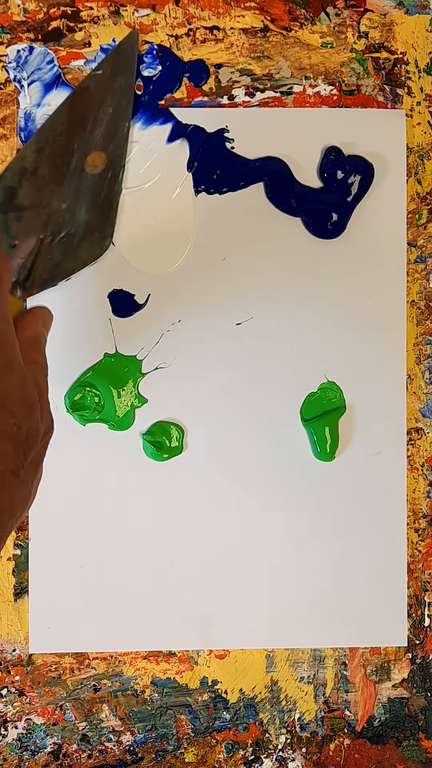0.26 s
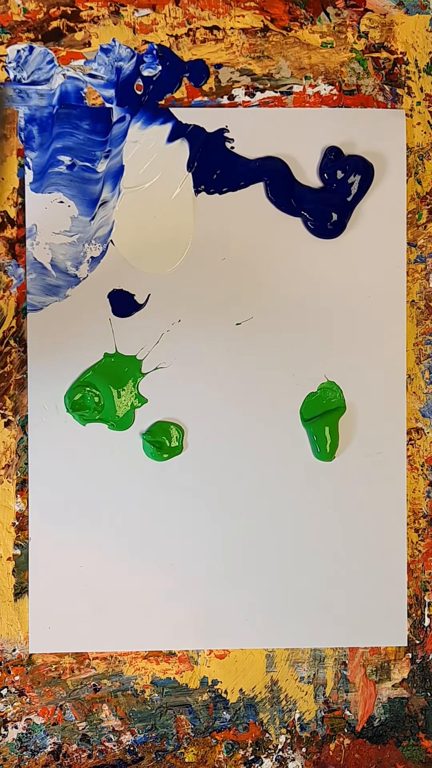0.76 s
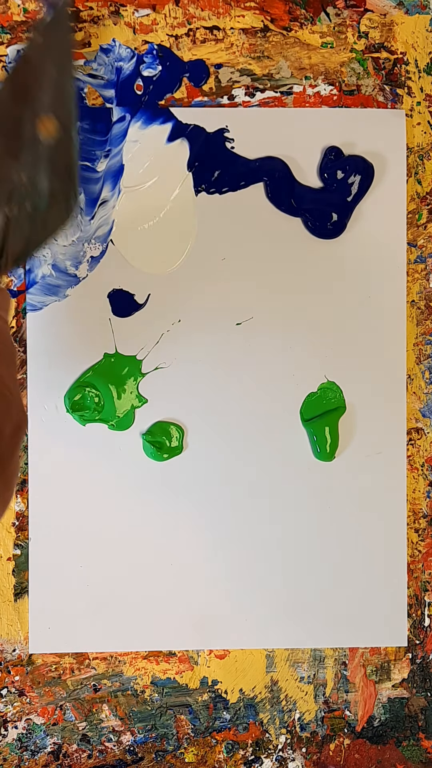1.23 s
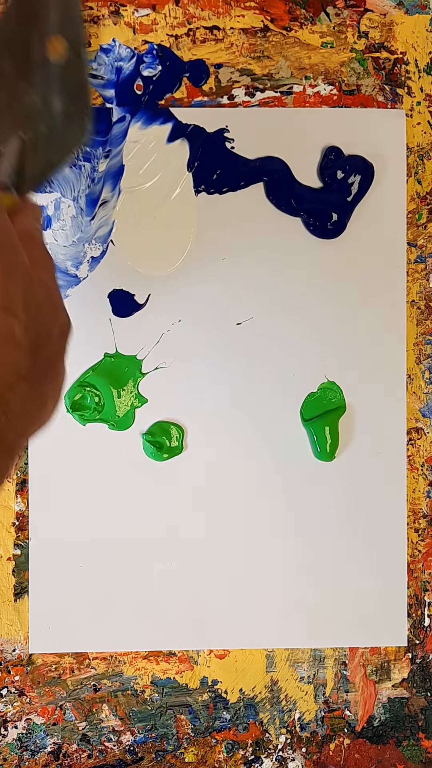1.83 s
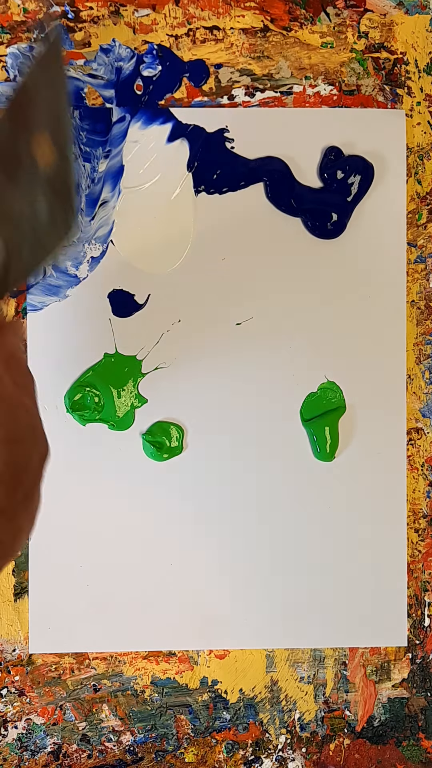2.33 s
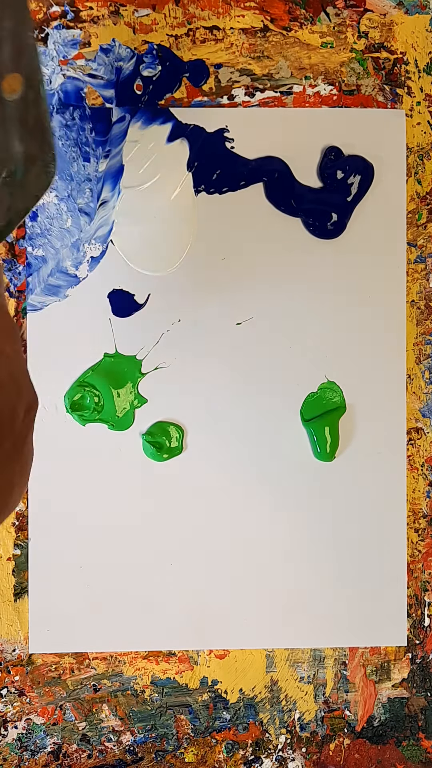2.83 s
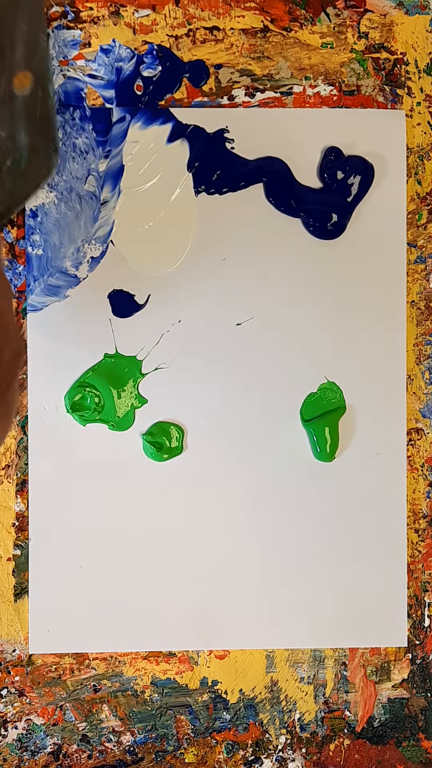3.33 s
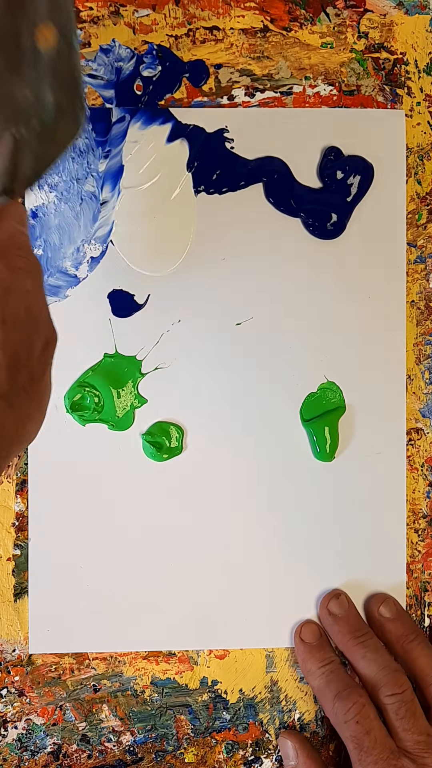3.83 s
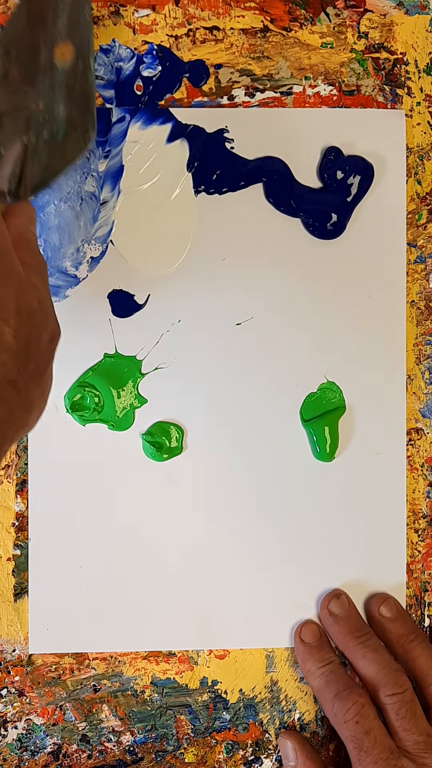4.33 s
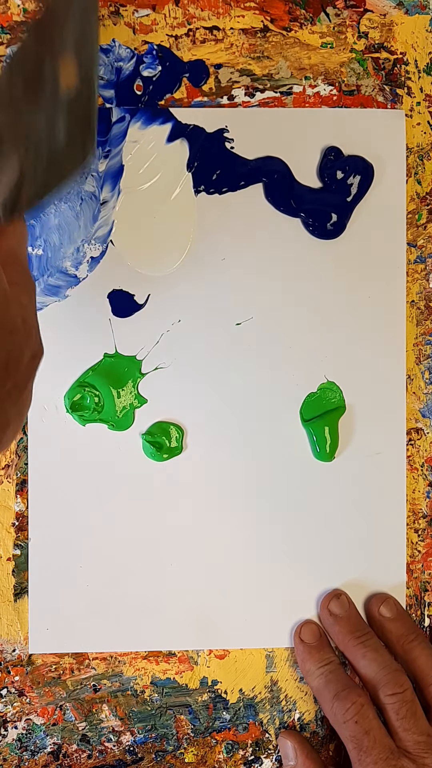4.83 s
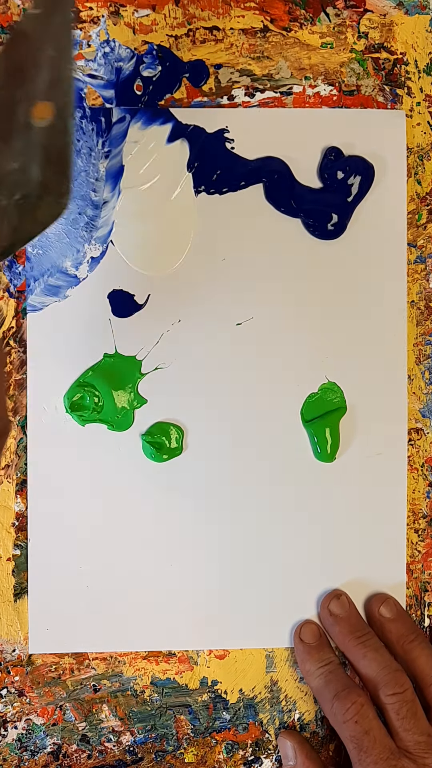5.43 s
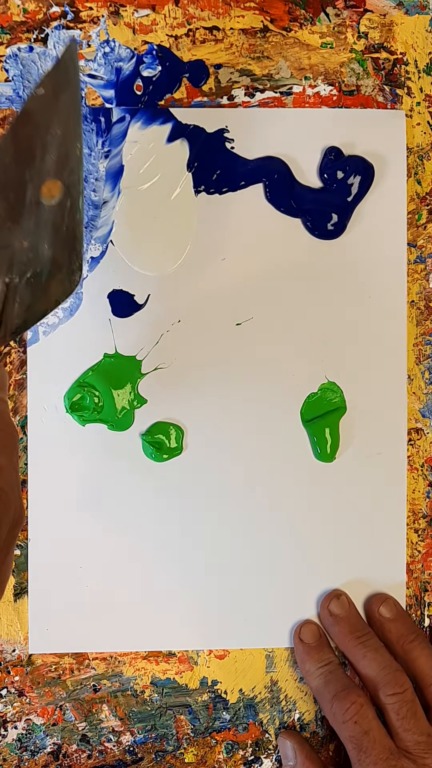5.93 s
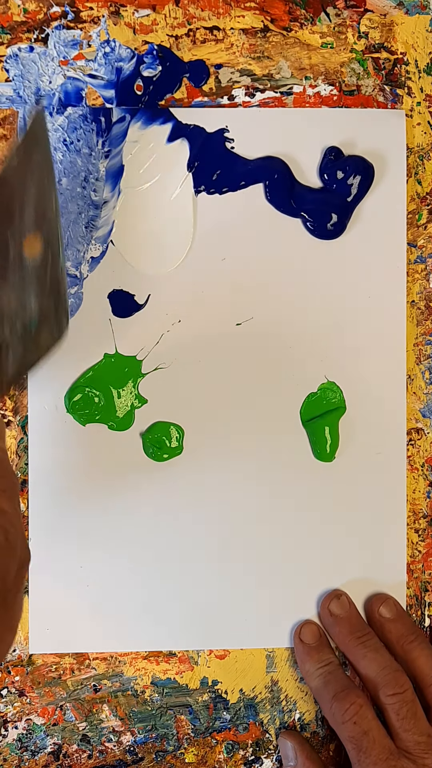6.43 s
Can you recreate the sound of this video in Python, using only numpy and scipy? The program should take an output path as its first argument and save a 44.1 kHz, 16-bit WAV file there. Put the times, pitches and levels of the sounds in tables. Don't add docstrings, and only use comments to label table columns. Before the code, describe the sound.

Soft hissing strokes and light dabs of a steel painting knife in wet paint, then hard, flat, rapid slaps with sticky peeling between them.

```python
import sys
import numpy as np
from scipy import signal
from scipy.fft import rfft, irfft, next_fast_len
from scipy.io import wavfile
from scipy.ndimage import uniform_filter1d, map_coordinates

SR = 44100
rng = np.random.default_rng(int(sys.argv[2]) if len(sys.argv) > 2 else 0)


def wrap_up_sound(samples):
    columns = np.atleast_2d(samples).T
    tamed = np.clip(columns, -1, 1)
    steps = np.round(tamed * 32767).astype(np.int16)
    wavfile.write(sys.argv[1], SR, steps)


def level_to_linear(level):
    exponent = np.asarray(level, float) / 20
    return 10 ** exponent


N = 294147
SPAN = 13600

# (time [s], level [dB])
HUM_LEVEL = [(0, -52), (.5, -54.5), (1.08, -58.5), (2.3, -61.5), (3.7, -68), (5, -68), (6.67, -48.5)]
# (frequency [Hz], gain [dB])
HUM_COLOUR = [(15, -34.5), (25, -7), (97, 1), (214, -18.5), (288, 1), (389, -9.5), (600, -9), (651, -2),
              (854, -14.5), (1060, -4.5), (4130, -26.5), (15200, -36.5), (16500, -41)]

# (full pressure [s], rise [s], hold [s], wet hiss [dB], paper rasp [dB])
STROKES = [
    (0.0, .01, 0.039, -71, -59),
    (0.281, .015, .005, -57, -44),
    (.432, 0.14, 0.04, -63.5, -57),
    (0.615, 0.13, 0.2, -64, -73),
    (0.821, 0.048, 0.006, -53, -42.5),
    (1.18, .01, 0.1, -72, -89),
    (1.296, 0.024, 0.013, -47.5, -46.5),
]
# (frequency [Hz], gain [dB])
RASP_COLOUR = [(700, -24), (1500, 3.5), (2700, 35.5), (3300, -21), (5000, -1)]
# (frequency [Hz], gain [dB])
PAINT_COLOUR = [(710, -54), (1200, 5), (2220, 8.5), (2950, 6), (3970, 3.5), (13000, -8.5), (15800, -8),
                (16500, -50.5)]
STROKES_END_S = 1.6
STROKE_RISE_DB, HISS_FADE_DB_PER_S, RASP_FADE_DB_PER_S = 37, 221, 295.5

# (time [s], peak [dB], blade edge [dB], table boom [dB], table body [dB])
DABS = [
    (0.272, -33.5, -26, -15, -33),
    (0.297, -33, -42, -16, -10),
    (0.435, -33.5, -45, -22, -9),
    (0.79, -37, -20, -25, -3),
    (0.83, -31.5, -32, -25, -9),
    (1.179, -36.5, -40, -14, -0.5),
    (1.204, -48.5, -24, -1, 3.5),
]
# (time [s], peak [dB], blade edge [dB], table boom [dB], table body [dB])
SLAPS = [(1.492, -5.5, -25, -19, -15.5), (1.791, -5, -37, -14.5, -2), (2.11, -7, -10.5, -28, -19.5),
         (2.408, -4.5, -21, -14.5, -11.5), (2.7, -2.5, -20.5, -26, -9.5),
         (3.034, -5.5, -17.5, -21.5, -13.5), (3.313, -5.5, -16, -26, -14.5),
         (3.497, -22.5, 1.5, -28.5, -36), (3.717, -3.5, -35, -18, -5), (3.936, -6, -24, -21, -10),
         (4.14, -4.5, -27, -16, -12), (4.314, -4, -33, -16.5, -5.5), (4.509, -4, -27, -22.5, -19.5),
         (4.701, -5, -21, -25, -10.5), (4.906, -3.5, -24.5, -33, -17), (5.122, -9, -22, -20, -13.5),
         (5.357, -9.5, -25.5, -18, -43), (5.609, -2.5, -29.5, -22.5, -8), (5.865, -5, -18.5, -32.5, -12),
         (6.092, -5.5, -8.5, -26, -6.5), (6.307, -5, -12.5, -17, -8.5), (6.513, -3.5, -8, -22, -13.5)]
# (frequency [Hz], gain [dB])
SLAP_COLOUR = [(240, -16), (400, -9), (538, -19), (1030, -11), (1430, -18.5), (4830, -28), (5300, -28.5),
               (10200, -34.5), (11900, -33.5), (15700, -42), (16500, -66.5)]
MIDDLING_EDGE_DB = -20
BRIGHT_GROWS = 0.63
PAN_DB, PAN_PER_EDGE = 8, -0.52

# (frequency [Hz], level [dB], decay t60 [s])
LEG_MODES = [(55, -5, .26), (67, -2, .26), (84, 0, .3)]
THUMP_DB, THUMP_GROWS = -19, 0.51
# (frequency [Hz], level [dB], decay t60 [s])
BOOM_MODES = [(113, -2, .3), (123, -4, .26), (133, 0, .28), (165, -10, .25), (200, -10, .25)]
# (frequency [Hz], level [dB], decay t60 [s])
BODY_MODES = [(268.5, -2.5, 0.32), (305.5, 2.5, 0.28), (327.4, 6.5, 0.13), (367, -4, 0.31),
              (406.5, -5.5, 0.31), (459.3, -6.5, 0.2)]
# (frequency [Hz], level [dB], decay t60 [s])
BOARD_MODES = [(581, -5, .16), (677, -1, .17), (861, -1, .12), (965, 0, .12), (1050, 0, .12),
               (1180, -5, .12), (1360, -7, .14)]
# (frequency [Hz], level [dB], decay t60 [s])
KNOCK_MODES = [(1035, -2, 0.029), (2100, -2, 0.013), (4300, -13.5, 0.017)]
KNOCK_DB = -7.5

# (frequency [Hz], level [dB], decay t60 [s])
BLADE_FAMILIES = [
    [(2055, 0, .22), (2150, 0, .22)],
    [(2719, 0, .38), (2800, -5, .3), (2870, -5, .3), (3000, -6, .28)],
    [(3250, 0, .34), (3480, -6, .26)],
    [(4100, -3, .28), (4300, 0, .3), (4474, -1, .3)],
    [(5350, -8, .26), (5600, -7, .26), (5852, -4, .3), (5922, 0, .34), (6266, -8, .26)],
]
# (level at a middling slap [dB], growth with edge [dB per dB])
FAMILY_WAKES = [(-24.5, 0.19), (-19.5, .65), (-25.5, 1.2), (-26, 0.61), (-23.5, 1.6)]
# (time [s], level [dB])
GRIP = [(0, -9), (2, -2), (3.3, 10), (3.75, -21), (3.9, 6.5), (5.4, 12.5), (5.8, -4), (6.67, -11)]
# (time [s], nearest frequency [Hz], extra level [dB])
SPOTS = [(.83, 2750, 24), (1.492, 2750, 0.5), (1.492, 5900, -1), (6.092, 5900, -10.5), (6.513, 5900, -12),
         (4.701, 2750, 1), (2.11, 5900, 1.5), (2.408, 3250, -1), (3.313, 2750, 10), (3.313, 4300, 9.5),
         (3.498, 5900, -24), (3.498, 2750, -14), (3.498, 3250, -12), (3.498, 4300, -14), (6.092, 2750, -9),
         (4.701, 3250, -15), (4.906, 3250, -15), (5.357, 3250, 6), (5.609, 3250, 9), (5.609, 5900, 9),
         (5.865, 2750, -11), (5.865, 5900, -1), (6.092, 4300, -5), (6.307, 2750, 4), (6.307, 2100, -6)]
# (frequency [Hz], level [dB], decay t60 [s])
BEND_MODE = [(949, 0, 0.34)]
BEND_DB = -28.5
# (frequency [Hz], width [Hz], lift [dB])
TIP_MODES = [(1790, 570, -4), (6540, 120, -3.5), (7670, 100, -11.5), (10660, 300, 5.5), (12070, 1800, 0.5)]

# (frequency [Hz], decay t60 [s])
ROOM_DECAY = [(300, 0.43), (1100, 0.33), (3000, 0.3), (8000, 0.34), (15000, 0.27)]
# (frequency [Hz], left-right likeness [0 to 1])
ALIKE = [(100, .995), (290, .95), (640, .5), (1400, .3), (3000, .05)]
LAG = 5.15

# (time [s], peak [dB], low part [dB])
SNAPS = [(0.6314, -40, -13), (1.2327, -43.5, -2), (1.279, -24, -7.5), (2.811, -21.5, -1.5),
         (2.823, -28, 20), (2.888, -30, 6), (3.1365, -25, 24), (3.2026, -31, 7), (5.2565, -30, 6),
         (4.02, -31, 6), (3.146, -26, -8), (3.3794, -23, -5.5), (3.796, -33.5, 0), (3.8032, -45.5, -3.5),
         (4.0644, -52, -1), (4.3894, -51.5, 6), (4.592, -22, -15), (4.815, -38, 1), (4.9794, -34.5, -3.5),
         (5.1923, -21.5, 4), (5.4484, -24, 12.5), (5.5086, -44, -18), (5.9266, -20, -14), (6.0024, -34, -3),
         (3.296, -40, 9),
    (3.694, -64, 2),
]

# (time [s], frequency [Hz], level [dB])
SINGS = [(1.492, 2698, -34), (1.492, 5883, -43), (1.492, 3241, -42), (1.492, 1943, -42), (2.11, 1620, -36),
         (2.11, 2720, -37), (2.11, 5853, -41), (2.11, 4469, -42), (2.408, 3219, -33), (2.408, 1945, -36),
         (3.313, 2745, -36), (3.313, 4404, -37), (3.313, 4286, -38), (3.313, 2960, -38), (5.609, 5885, -45),
         (5.609, 2719, -41), (6.092, 1620, -37), (6.092, 2575, -39), (6.092, 4106, -39), (6.092, 3939, -36),
         (6.092, 5328, -37), (6.307, 1620, -39), (6.307, 2671, -35), (6.307, 3437, -40), (6.307, 4103, -38),
         (6.307, 5050, -41), (6.513, 2721, -36), (6.513, 5206, -38)]
SING_T60_S = .31

# (time [s], peel level [dB])
LIFTS = [(1.555, -43.5), (1.882, -52.5), (2.178, -39), (2.481, -39), (2.756, -40.5), (3.113, -40.5),
         (3.379, -38.5), (3.798, -44), (4.017, -44.5), (4.226, -50.5), (4.394, -48.5), (4.596, -47),
         (4.782, -47), (4.987, -44.5), (5.231, -51), (5.457, -42), (5.748, -59), (5.994, -46.5),
         (6.172, -39), (6.404, -52), (6.6, -45.5)]
STRETCH_S = .06


def unit(x):
    return x / np.sqrt(np.mean(x ** 2) + 1e-20)


def along(points, hz):
    f, v = np.transpose(points)
    return np.interp(np.log(hz + 1), np.log(f + 1), v)


def curves(rows):
    s, *cols = np.transpose(rows)
    return [np.interp(np.arange(N) / SR, s, c) for c in cols]


def add(track, s, sound):
    start = round(s * SR)
    track[:, start:start + sound.shape[1]] += sound


def diffuse(n, t60_scale=np.inf):
    hz, t, z = signal.stft(rng.standard_normal((2, n)), SR, nperseg=256)
    turn = np.arccos(np.clip(along(ALIKE, hz), -1, 1)) / 2
    z = z * level_to_linear(-60 * t / (t60_scale * along(ROOM_DECAY, hz)[:, None]))
    weights = np.array([np.cos(turn), np.sin(turn)])[..., None]
    mid, side = signal.istft(z * weights, nperseg=256)[1][:, :n]
    return np.array([mid + side, mid - side])


def coloured(x, colour):
    n = x.shape[-1]
    m = next_fast_len(n + 4096) // 2 * 2
    gain = level_to_linear(colour(np.fft.rfftfreq(m, 1 / SR))) + 1e-6
    cepstrum = irfft(np.log(unit(gain)), m)
    cepstrum[1:m // 2] *= 2
    cepstrum[m // 2 + 1:] = 0
    return irfft(rfft(x, m) * np.exp(rfft(cepstrum)), m)[..., :n]


def ports(x, pan_db):
    cycles = np.fft.rfftfreq(len(x))
    late = irfft(rfft(x) * np.exp(-2j * np.pi * cycles * LAG), len(x))
    return np.array([x * level_to_linear(pan_db / 2), late * level_to_linear(-pan_db / 2)])


def hum():
    return level_to_linear(curves(HUM_LEVEL)[0] - 6) * coloured(diffuse(N), lambda hz: along(HUM_COLOUR, hz))


def drag():
    s, rise, hold, hiss_db, rasp_db = np.transpose(STROKES)[..., None]
    n = round(STROKES_END_S * SR)
    t = np.arange(n) / SR - s

    def pressure(db, fade):
        rising_db = STROKE_RISE_DB * np.minimum(t / rise, 0)
        fading_db = fade * np.maximum(t - hold, 0)
        return level_to_linear(db + rising_db - fading_db).sum(0)

    hiss = pressure(hiss_db, HISS_FADE_DB_PER_S) * coloured(diffuse(n), lambda hz: along(PAINT_COLOUR, hz))
    rasp = pressure(rasp_db - 7.5, RASP_FADE_DB_PER_S) * coloured(diffuse(n), lambda hz: along(RASP_COLOUR, hz))
    return np.pad(hiss + rasp, ((0, 0), (0, N - n)))


def crack(t60):
    t = np.arange(SPAN) / SR
    spikes = rng.standard_normal(SPAN) * level_to_linear(4.3 * rng.standard_normal(SPAN))
    return unit(spikes) * level_to_linear(-60 * t / t60) * (1 - np.exp(-t / 0.0015))


def ring(modes, scatter_db, attack, flutter=0):
    hz, db, t60 = np.transpose(modes)[..., None]
    size, detune = rng.standard_normal((2, len(modes), 1))
    t = np.arange(SPAN) / SR
    steps = rng.standard_normal((len(modes), SPAN // 16))
    wander = np.repeat(np.cumsum(steps, axis=1), 16, axis=1)
    phase = 2 * np.pi * hz * (1 + .05 * flutter * detune) * t + uniform_filter1d(flutter * wander, size=32)
    waves = level_to_linear(db + scatter_db * size - 60 * t / t60) * np.sin(phase)
    return waves.sum(0) * (1 - np.exp(-t / attack)) / np.sqrt(np.sum(level_to_linear(db) ** 2))


def woken(s, edge_db):
    level_db, grows = np.transpose(FAMILY_WAKES)
    strengths_db = level_db + grows * (edge_db - MIDDLING_EDGE_DB)
    strengths_db[0] += np.interp(s, *np.transpose(GRIP))
    centres = np.array([np.mean([mode[0] for mode in family]) for family in BLADE_FAMILIES])
    for when, hz, extra_db in SPOTS:
        nearest = np.argmin(abs(np.log(centres / hz)))
        strengths_db[nearest] += extra_db * (abs(when - s) < .01)
    return strengths_db


def hump(hz, centre_hz, width_hz):
    return 1 / np.sqrt(1 + (2 * (hz - centre_hz) / width_hz) ** 2)


def slap_colour(blade_db, air_db, strengths_db):
    tilt = [(1400, 0.0074), (4000, blade_db + 14.5), (10000, air_db + 16.0)]
    tip_db = rng.normal(0, 1, len(TIP_MODES))
    ripple = rng.standard_normal(90)

    def colour(hz):
        ripple_db = 2.9 * np.clip(hz / 3000 - .3, 0, 1) * map_coordinates(ripple, [hz / 260])
        base = level_to_linear(along(SLAP_COLOUR, hz) + along(tilt, hz) + ripple_db)
        base *= 1 + sum(level_to_linear(db + more - 4) * hump(hz, centre, width) ** 2
                        for (centre, width, db), more in zip(TIP_MODES, tip_db))
        modes = sum(level_to_linear(2 * (top + 2 + db)) * hump(hz, centre, width_hz=150) ** 4
                    for family, top in zip(BLADE_FAMILIES, strengths_db) for centre, db, _ in family)
        return 10 * np.log10(base ** 2 + modes)
    return colour


def table_thump(boom_db, body_db):
    table = level_to_linear(boom_db + 9) * ring(BOOM_MODES, scatter_db=2.5, attack=0.009, flutter=0.03)
    table += level_to_linear(body_db + 0.5) * ring(BODY_MODES, scatter_db=1.93, attack=0.0043, flutter=0.047)
    legs_db = THUMP_DB + THUMP_GROWS * boom_db
    return table + level_to_linear(legs_db) * ring(LEG_MODES, scatter_db=3, attack=.007, flutter=.03)


def board_knock(edge_db):
    board = level_to_linear(-18.0) * ring(BOARD_MODES, scatter_db=4.0, attack=0.00015, flutter=0.058)
    knock_db = KNOCK_DB - .15 * (edge_db - MIDDLING_EDGE_DB)
    return board + level_to_linear(knock_db) * ring(KNOCK_MODES, scatter_db=3, attack=.0003, flutter=.05)


def blade_ring(strengths_db):
    blade = sum(level_to_linear(level - 21.0) * ring(family, scatter_db=-5.5, attack=.0005, flutter=0.032)
                for family, level in zip(BLADE_FAMILIES, strengths_db))
    return blade + level_to_linear(BEND_DB) * ring(BEND_MODE, scatter_db=-0.5, attack=0.0049, flutter=0.0093)


def slap_air(pan_db):
    t = np.arange(SPAN) / SR
    early = level_to_linear(-7.5) * diffuse(SPAN, t60_scale=0.17) * (1 - np.exp(-t / 0.00078))
    tail = level_to_linear(-16.0) * diffuse(SPAN, t60_scale=1) * (1 - np.exp(-t / 0.00047))
    return ports(level_to_linear(5.5) * crack(t60=0.0076), pan_db) + early + tail


def slaps():
    track = np.zeros((2, N + SPAN))
    held = level_to_linear(-90 * (np.arange(SPAN) / SR) ** 2)
    for s, db, edge_db, boom_db, body_db in [*DABS, *SLAPS]:
        pan_db = np.clip(PAN_DB + PAN_PER_EDGE * (edge_db - MIDDLING_EDGE_DB), -4, 9)
        strengths_db = woken(s, edge_db)
        table = table_thump(boom_db, body_db)
        near = board_knock(edge_db) + blade_ring(strengths_db)
        air = coloured(slap_air(pan_db), slap_colour(BRIGHT_GROWS * edge_db, edge_db, strengths_db))
        add(track, s - .0005, level_to_linear(db) * held * (air + ports(near, pan_db) + table))
    return track[:, :N]


def snaps():
    track, t = np.zeros((2, N + SPAN)), np.arange(SPAN) / SR
    for s, db, low_db in SNAPS:
        points = [(300, low_db - 22), (1800, low_db + 5.0), (4000, 3.0), (12000, -7.5), (16500, -16.5)]
        room = level_to_linear(-17) * diffuse(SPAN, t60_scale=0.55) * (1 - np.exp(-t / 0.0033))
        tick = ports(crack(t60=0.01), 1.2) + room
        add(track, s - .0006, level_to_linear(db + 3) * coloured(tick, lambda hz: along(points, hz)))
    return track[:, :N]


def sings():
    track = np.zeros((2, N + SPAN))
    damped = level_to_linear(-170 * (np.arange(SPAN) / SR) ** 2)
    port_db = np.array([[5.5], [3.5]])
    for s, hz, db in SINGS:
        mode = ring([(hz, 0, SING_T60_S)], scatter_db=0, attack=.004, flutter=.05)
        add(track, s, level_to_linear(db + port_db) * damped * mode)
    return track[:, :N]


def peels():
    pull, t = np.zeros((1, N + SPAN)), np.arange(SPAN) / SR - STRETCH_S
    swell = np.where(t < 0, np.exp(-(t / 0.052) ** 2 / 2), level_to_linear(-60 * t / 0.3))
    for s, peel_db in LIFTS:
        add(pull, s - STRETCH_S, level_to_linear(peel_db) * swell[None])
    grit = level_to_linear(29 * uniform_filter1d(rng.standard_normal(N), size=50))
    return pull[:, :N] * grit * coloured(diffuse(N), lambda hz: along(PAINT_COLOUR, hz))


def scene():
    return hum() + drag() + slaps() + snaps() + sings() + peels()


def top_cut(x):
    return signal.sosfilt(signal.butter(12, 16830, fs=SR, output="sos"), x)


def record(dry):
    cut = signal.sosfilt(signal.butter(4, 54, "high", fs=SR, output="sos"), dry)
    held = cut / (1 + np.abs(cut / 1.0) ** 6) ** (1 / 6)
    return top_cut(held)


dry = scene()
out = record(dry)
wrap_up_sound(out)
```